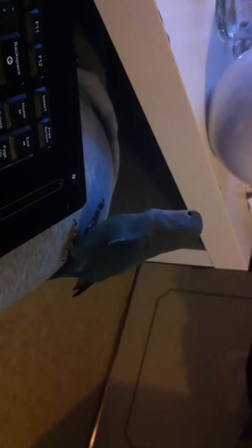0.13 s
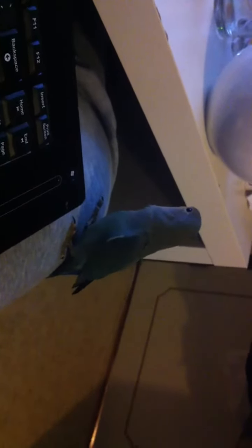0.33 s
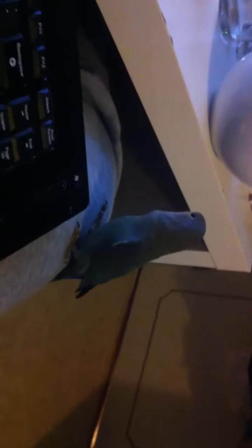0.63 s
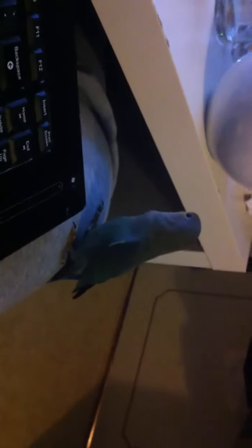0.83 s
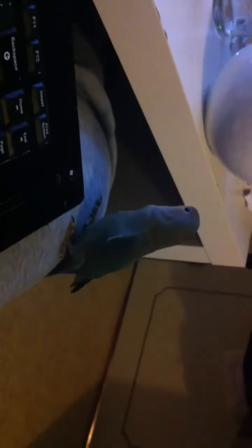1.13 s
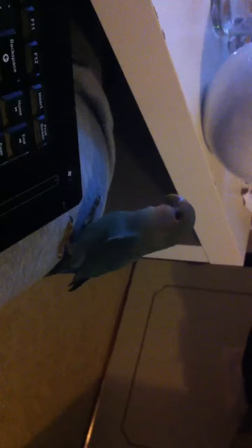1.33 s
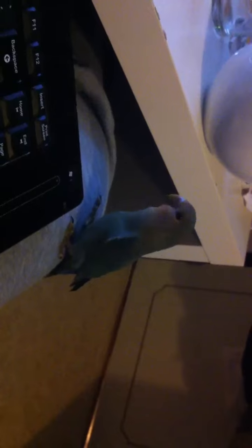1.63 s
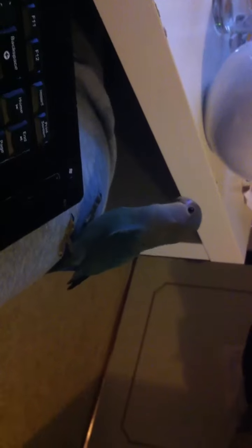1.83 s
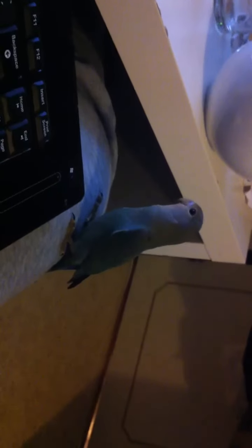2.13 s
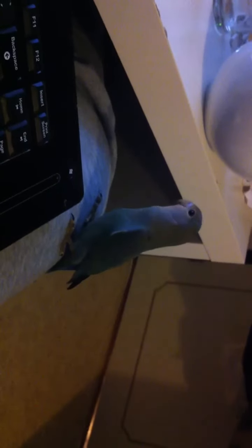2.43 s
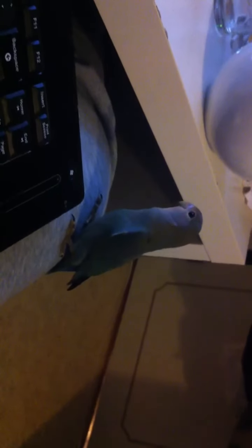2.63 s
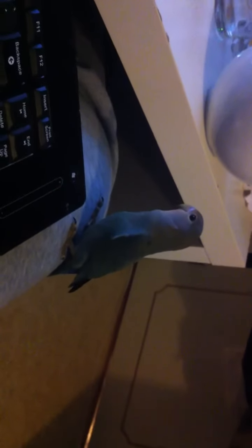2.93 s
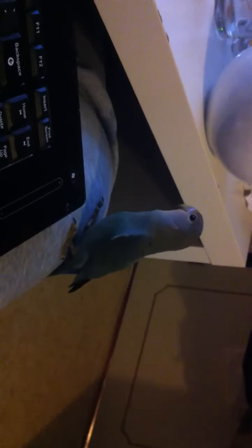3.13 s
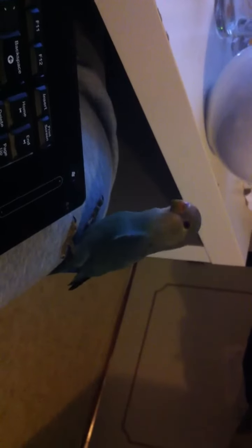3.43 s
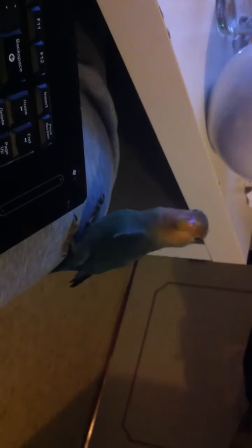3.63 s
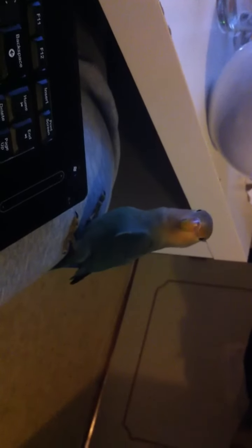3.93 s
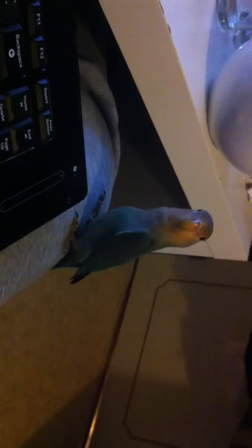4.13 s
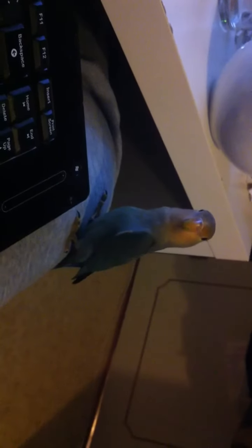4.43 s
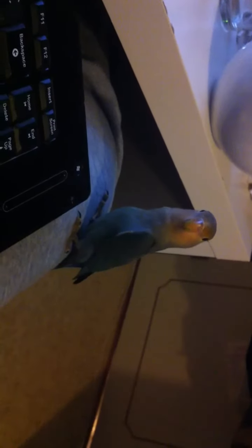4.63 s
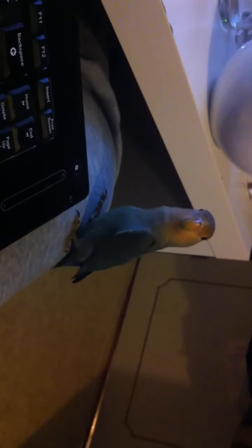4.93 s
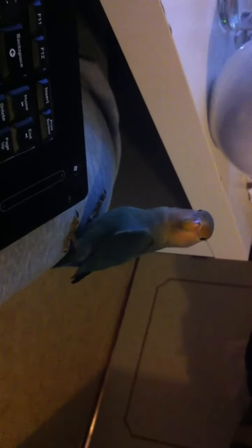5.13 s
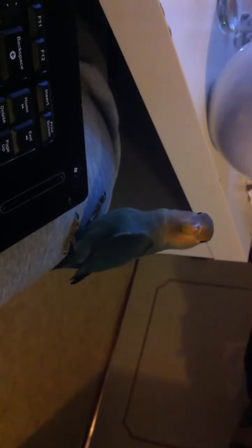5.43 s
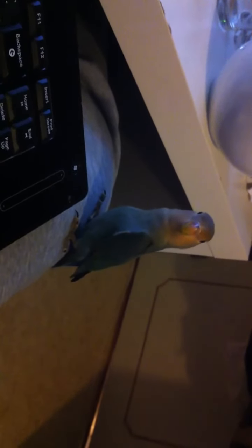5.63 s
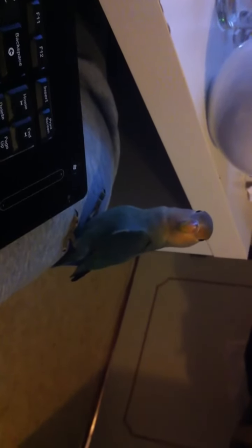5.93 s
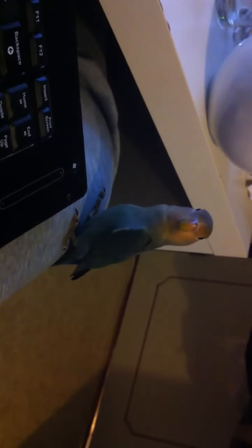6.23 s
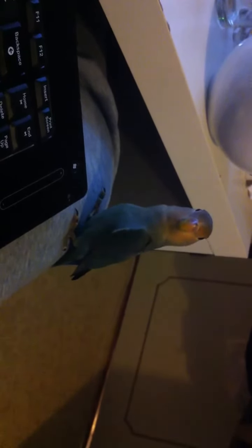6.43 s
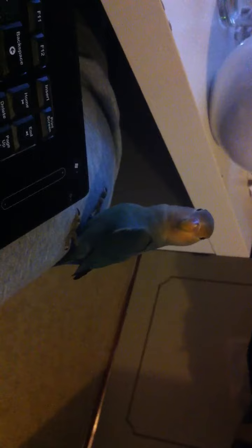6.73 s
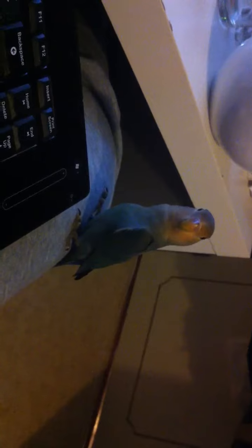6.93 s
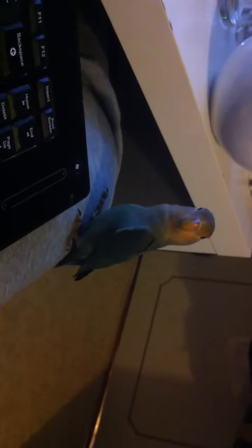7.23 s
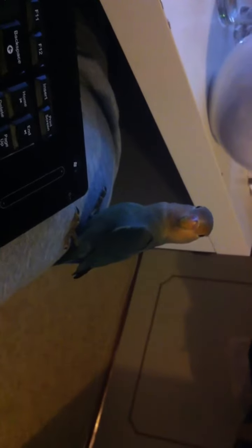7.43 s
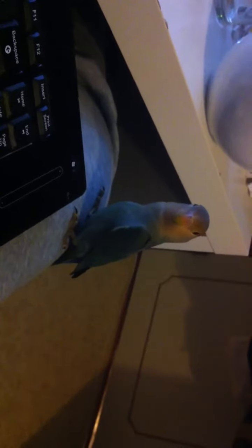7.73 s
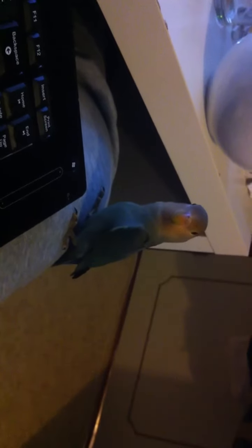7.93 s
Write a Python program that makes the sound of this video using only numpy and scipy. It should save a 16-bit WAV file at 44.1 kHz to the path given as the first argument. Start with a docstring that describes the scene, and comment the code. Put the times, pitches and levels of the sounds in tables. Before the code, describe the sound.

Close, dry beak pecks on a desk edge in a small quiet indoor room. After a single opening tap and a pause, two to five pecks a second follow, unevenly spaced and varying in force, the hardest brighter and sharper. Hollow wood rings briefly under each click, with a tiny gritty crunch. Soft wavering low hum and gentle hiss continue throughout, in mono.

```python
"""Parrot pecking a desk

A small parrot taps its beak on the edge of a hollow wooden desk in a quiet room.
Each peck sums a sharp contact tick, ringing desk modes, a bright crunch, a slow shove and a noise-built room tail.
A soft low bump, a narrow-band noise hum and shaped room noise with hiss lie underneath.
"""
import sys
import numpy as np
from scipy import signal
from scipy.fft import rfft, irfft
from scipy.io import wavfile
from scipy.ndimage import uniform_filter1d

SR = 44100
rng = np.random.default_rng(int(sys.argv[2]) if len(sys.argv) > 2 else 0)


def wav_record(signal):
    """Record a signal, one row per channel, as 16-bit PCM in the file named by sys.argv[1]."""
    frames = np.transpose(np.atleast_2d(signal))
    bounded = np.clip(frames, -1, 1)
    # unit amplitude maps onto the largest positive 16-bit level
    quanta = np.round(bounded * 32767).astype(np.int16)
    wavfile.write(sys.argv[1], SR, quanta)


N = 356548


def gain_of(db):
    """Amplitude ratio of a level in dB."""
    return 10 ** (np.asarray(db) / 20)


def evened(x):
    """Scale to unit RMS."""
    return x / np.sqrt(np.mean(x ** 2) + 1e-20)


def read(points, hz):
    """Interpolate a (Hz, value) curve over log frequency."""
    f, value = np.transpose(points)
    return np.interp(np.log(hz + 1), np.log(f + 1), value)


def add(mix, start_s, sound):
    """Add a sound into the mix in place, cut at the end."""
    part = mix[round(start_s * SR):][:len(sound)]
    part += sound[:len(part)]


def ring(t, hz, t60_s, db, rise_s=1e-5):
    """One mode: a sine with exponential rise and decay, silent before t = 0."""
    t = np.maximum(t, 0)
    envelope = gain_of(db - 60 * t / t60_s) * (1 - np.exp(-t / rise_s))
    return envelope * np.sin(2 * np.pi * hz * t)


MOVES_AT_S = 1  # before this the beak hits another spot of the edge
MIDDLING_DB = -20
CONTACT_MS = (0.035, 0.025)  # middling peck: usual spot, other spot
QUICKENS_DB_PER_DB = 0.36  # shortening of contact per dB of harder peck
TILT_DB_PER_OCT = (0.6, 0.7)  # knock of a middling peck: usual spot, other spot
BRIGHTENS_DB_PER_OCT_PER_DB = 0.044
TAIL_DB, TAIL_FOLLOWS = -20, 0.49  # re tick, share of the knock's dB added
SHOVE_DB = -19  # re knock
RADIATES_HZ = 155
# Pecks. Each row: start in seconds, tick level in dB, knock level in dB re tick.
PECKS = [(0.1585, -19, -14), (1.2537, -28.5, -15.5), (1.3944, -11, -16.5), (1.6313, -23.5, -15.5),
         (1.7712, -14.5, -13.5), (2.0844, -18, -14.5), (2.3279, -15, -15.5), (2.6263, -20, -19.5),
         (2.7074, -16.5, -14.5), (3.0558, -20.5, -15), (3.2972, -28, -16), (3.5282, -23, -12),
         (3.7, -16, -18.5), (3.8735, -22, -13), (4.0436, -20, -12.5), (4.2138, -23, -13),
         (4.6426, -20.5, -13.5), (4.768, -16, -13), (4.9951, -24, -16), (5.1041, -18.5, -13),
         (5.5978, -21.5, -14), (5.7552, -22.5, -11), (5.9853, -21.5, -14), (6.094, -19.5, -11),
         (6.645, -23.5, -17), (6.7759, -27.5, -14), (7.044, -22.5, -15.5), (7.1302, -18, -13)]


def pecks():
    """Harder pecks have shorter contact and a brighter knock; each room tail mixes a shared and a fresh one."""
    out, shoves = np.zeros(N), np.zeros(N)
    lead, count = 20, 13000  # samples
    t = (np.arange(count) - lead) / SR
    shared_tail = tail(count)
    chance = rng.standard_normal((len(PECKS), len(DESK_MODES) + 2 * len(EDGE_MODES)))
    for (start_s, db, knock_db), c in zip(PECKS, chance):
        spot, harder_db = int(start_s < MOVES_AT_S), db - MIDDLING_DB
        contact_s = CONTACT_MS[spot] / 1000 * gain_of(-QUICKENS_DB_PER_DB * harder_db)
        tilt = TILT_DB_PER_OCT[spot] + BRIGHTENS_DB_PER_OCT_PER_DB * harder_db
        room = .6 * shared_tail + .8 * tail(count)
        sound = tick(t, contact_s, c[len(DESK_MODES):]) + crunch(t)
        sound += gain_of(knock_db) * knock(t, spot, tilt, c)
        add(out, start_s - lead / SR, gain_of(db) * sound)
        add(out, start_s, gain_of(db + TAIL_DB + TAIL_FOLLOWS * knock_db) * room)
        add(shoves, start_s - lead / SR, gain_of(db + knock_db + SHOVE_DB) * shove(t))
    # a panel of this size radiates little below its lowest modes; the shove bypasses this cut
    radiation = signal.butter(2, RADIATES_HZ, "high", fs=SR, output="sos")
    return shoves + signal.sosfilt(radiation, out)


TICK_CORNER_HZ = 10000
# Ring of beak and hard edge. Each row: nominal frequency in Hz, t60 in seconds, nominal level in dB re tick.
EDGE_MODES = [(3724, 0.026, -26.5), (4730, 0.0033, -15), (6100, 0.039, -25), (7240, 0.021, -36),
              (8240, 0.02, -24.5), (9360, 0.02, -27), (11000, 0.028, -29.5)]
# Echoes off nearby faces. Each row: delay in seconds, level in dB re spike.
ECHOES = [(.0009, -18), (.0013, -16), (.0021, -20), (.003, -20), (.004, -22)]


def tick(t, width_s, chance):
    """Suction spike set by contact time, slower wood rebound, near echoes and edge ring."""
    def spike(u):
        return -np.exp(-(u / width_s) ** 2)

    out = spike(t)
    for k, (delay_s, db) in enumerate(ECHOES):
        out += gain_of(db) * spike(t - delay_s) * (-1) ** k
    out += gain_of(-9.5) * np.exp(-((t - .00042) / .00017) ** 2)  # rebound
    for (hz, t60_s, db), (detune, louder) in zip(EDGE_MODES, chance.reshape(-1, 2)):
        out += ring(t, hz * (1 + .02 * detune), t60_s, db + 1.8 * louder)
    # soften the tick: low-pass with a broad lift around the corner
    lift = signal.lfilter(*signal.iirpeak(TICK_CORNER_HZ, 1.2, fs=SR), out)
    return 1.19 * lift + signal.lfilter(*signal.butter(3, TICK_CORNER_HZ, fs=SR), out)


FRAME_HZ = 300  # below this the whole frame swings against the top
# Desk top modes, levels relative, before tilt and chance.
# Each row: frequency in Hz, t60 in seconds, level in dB from the usual spot, level in dB from the other spot.
DESK_MODES = [(140.4, 0.11, -12.5, -7.5), (170, 0.052, -7.5, -27), (205, 0.13, -7, -4),
              (253.8, 0.12, -5, -1.5), (344, 0.32, -14.5, -9.5), (405, 0.043, 7.5, 7), (422.9, 0.2, -6, -8),
              (459.5, 0.22, -9.5, -10), (549.6, 0.054, -3, -9), (579, 0.067, -1, 0),
              (623.3, 0.19, -12, -15), (649.7, 0.11, -6.5, -6), (685, 0.074, -16, -8),
              (744, 0.099, -7.5, -30), (847, 0.047, -10, -1.5), (801, 0.11, -21, -8),
              (922, 0.041, -3.5, -4), (969, 0.031, -2.5, -26), (1019.6, 0.1, -12, -28),
              (1046, 0.085, -29, -22), (1232, 0.075, -31, -12), (1323, 0.013, -3.5, -13),
              (1510, 0.1, -25, -27), (1649, 0.019, -2.5, -14), (1908, 0.092, -23, -35),
              (2120, 0.055, -21.5, -26), (2320, 0.072, -35, -28), (2630, 0.044, -17.5, -32),
              (2856, 0.02, -19.5, -13.5)]


def knock(t, spot, tilt_db_per_oct, chance):
    """Desk modes: low ones start later, those below the frame limit inverted; tilt sets brightness."""
    out = np.zeros(len(t))
    for (hz, t60_s, *spot_db), c in zip(DESK_MODES, chance):
        db = spot_db[spot] + tilt_db_per_oct * np.log2(hz / 500) + .9 * c
        mode = ring(t - 0.27 / hz, hz, t60_s, db, rise_s=0.84 / hz)
        out += np.sign(hz - FRAME_HZ) * mode
    return out / np.sqrt(np.mean(out[:900] ** 2))  # unit RMS at the onset


CRUNCH_DB, CRUNCH_LOW_HZ, CRUNCH_T60_S = -25.5, 5000, 0.031  # level re tick


def crunch(t):
    """Short bright crunch after the tick: a decaying burst of high-passed noise."""
    high_pass = signal.butter(2, CRUNCH_LOW_HZ, "high", fs=SR)
    noise = signal.lfilter(*high_pass, rng.standard_normal(len(t)))
    return (t > 0) * gain_of(CRUNCH_DB - 60 * t / CRUNCH_T60_S) * noise


SHOVE_PEAK_S = 0.0005


def shove(t):
    """The desk gives way briefly: one negative pulse of unit peak."""
    u = np.maximum(t, 0) / SHOVE_PEAK_S
    return -u * np.exp(1 - u)


# Room decay. Each row: frequency in Hz, t60 in seconds.
ROOM_DECAY = [(150, 0.18), (1000, 0.23), (3000, 0.21), (7000, 0.15), (14000, 0.17)]
# Starting spectrum of the tail. Each row: frequency in Hz, relative level in dB.
TAIL_SPECTRUM = [(120, -37), (300, 8), (600, 23), (1100, 5), (2000, 1), (3500, -1.5), (6000, -0.5),
                 (9000, -4.5), (12000, -11), (16000, -25)]


def tail(count):
    """Dense reflections: noise whose bands each decay at their own rate."""
    taps = rng.standard_normal(count)
    hz, t, z = signal.stft(taps, SR, nperseg=128)
    start_db = read(TAIL_SPECTRUM, hz)[:, None]
    t60_s = read(ROOM_DECAY, hz)[:, None]
    z = z * gain_of(start_db - 60 * t / t60_s)
    rise = 1 - np.exp(-np.arange(count) / SR / 0.00007)
    out = signal.istft(z, SR, nperseg=128)[1][:count] * rise
    return out / np.sqrt(np.mean(out[300:1500] ** 2))


# Soft low bumps. Each row: start in seconds, level in dB, frequency in Hz, t60 in seconds.
THUDS = [(.714, -39, 202, 0.067)]


def thuds():
    """Dull bump: two slowly rising, decaying low modes."""
    out, t = np.zeros(N), np.arange(8000) / SR
    for start_s, db, hz, t60_s in THUDS:
        upper = ring(t, hz, t60_s, db, rise_s=0.0066)
        lower = ring(t, 0.81 * hz, t60_s, db - 9.5, rise_s=.008)
        add(out, start_s, upper + lower)
    return out


# Hum bands. Each row: centre in Hz, width between half-amplitude points in Hz, RMS level in dB.
HUM = [(104, 10, -86.5), (186.7, 11.7, -65), (226.9, 18, -61.5), (262, 14, -60), (311.8, 6.6, -71.5),
       (525, 15, -70.5), (566, 41, -68.5), (693, 6.5, -73.5), (981, 39, -74.5)]


def hum():
    """Wavering tones: one noise through narrow resonances."""
    noise, f = rfft(rng.standard_normal(N)), np.fft.rfftfreq(N, 1 / SR)
    out = np.zeros(N)
    for hz, width_hz, db in HUM:
        band = noise / (1 + (2 * (f - hz) / width_hz) ** 2)
        out += gain_of(db) * evened(irfft(band, N))
    return out


AIR_RMS_DB, PATCHES_RMS_DB = -55.5, 0.91
# Room noise and hiss spectrum. Each row: frequency in Hz, relative density in dB per Hz.
AIR_SPECTRUM = [(20, -46), (60, -73), (85, -32), (150, -20.5), (180, -20), (259, -6), (330, -7.5),
                (568, -16.5), (854, -21), (1300, -26), (3060, -34.5), (8000, -39), (16500, -42.5)]


def air():
    """Broad room noise and microphone hiss: shaped noise with faint drifting patches."""
    frames, bins = N // 256 + 6, 513
    real, imag, patches = rng.standard_normal((frames, bins, 3)).T
    patches = uniform_filter1d(patches, size=10, axis=0)
    patches = evened(uniform_filter1d(patches, size=16, axis=1))
    z = (real + 1j * imag) * gain_of(PATCHES_RMS_DB * patches)
    noise = signal.istft(z, nperseg=1024, noverlap=768)[1][:N]
    colour = gain_of(read(AIR_SPECTRUM, np.fft.rfftfreq(N, 1 / SR)))
    return gain_of(AIR_RMS_DB) * evened(irfft(rfft(noise) * colour, N))


def scene():
    """Sum of all sources, one channel."""
    return (pecks() + thuds() + hum() + air())[None]


CUT_HZ = 15900


def record(dry):
    """Linear-phase low-pass: nothing above the top treble."""
    low_pass = signal.firwin(301, CUT_HZ, window=("kaiser", 9), fs=SR)
    return signal.oaconvolve(dry, low_pass[None], "same")


dry = scene()
out = record(dry)
wav_record(out)
```